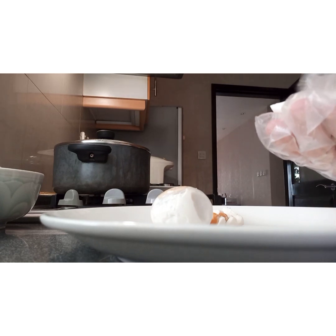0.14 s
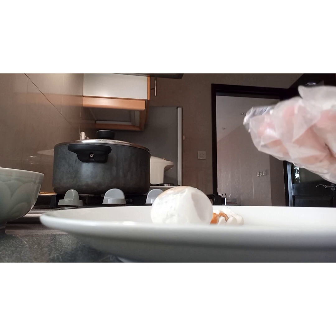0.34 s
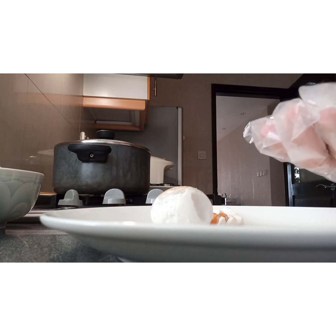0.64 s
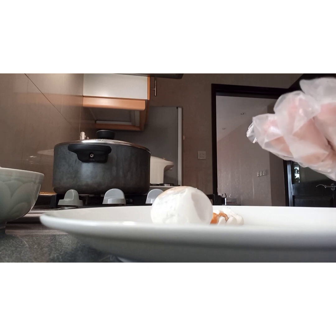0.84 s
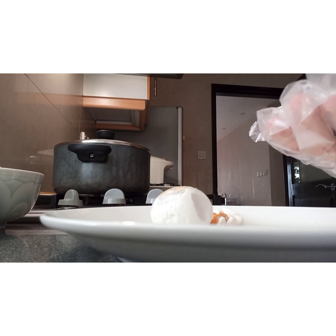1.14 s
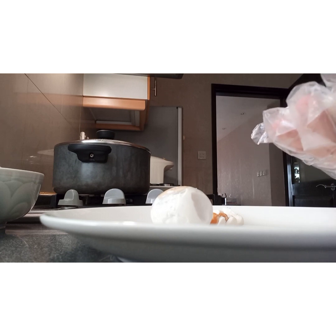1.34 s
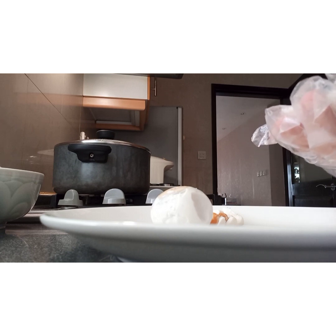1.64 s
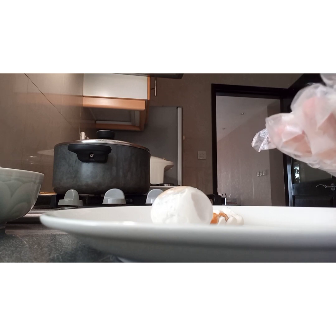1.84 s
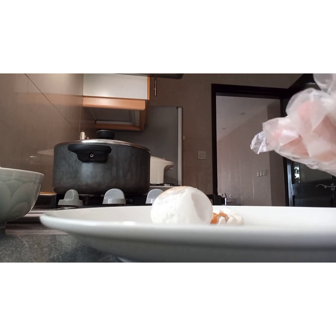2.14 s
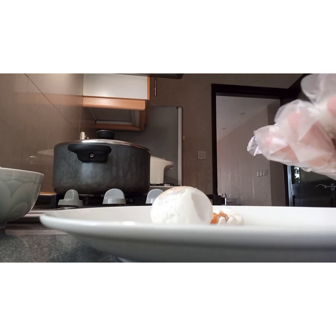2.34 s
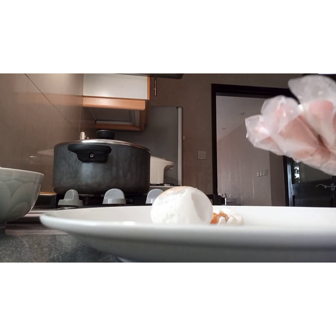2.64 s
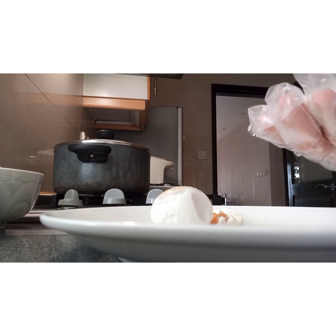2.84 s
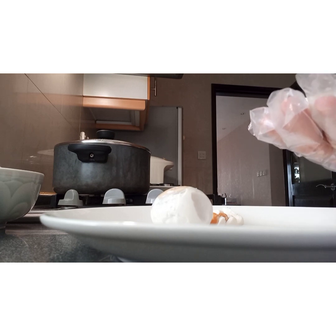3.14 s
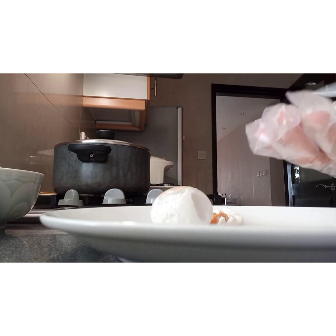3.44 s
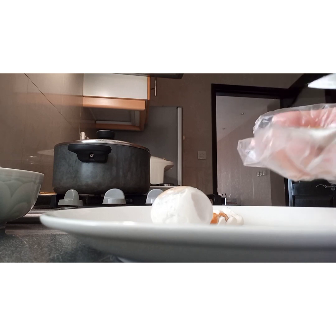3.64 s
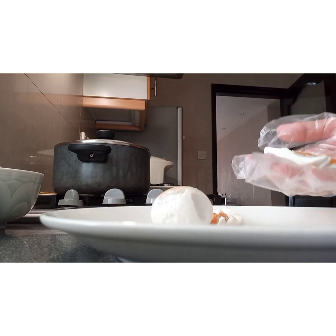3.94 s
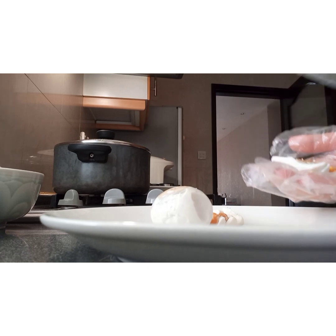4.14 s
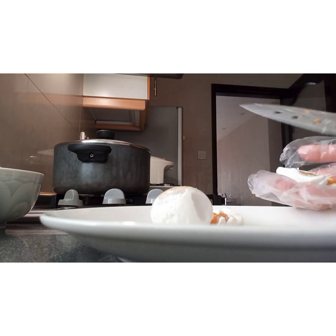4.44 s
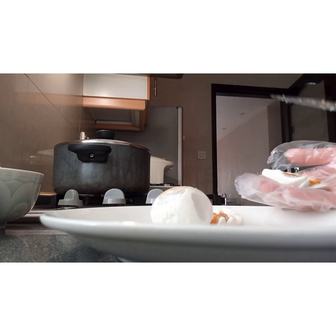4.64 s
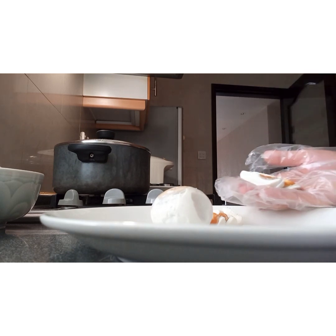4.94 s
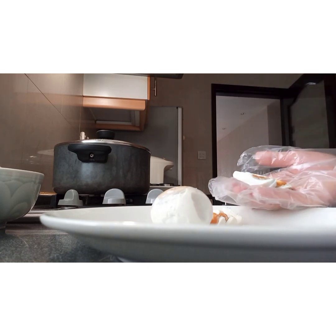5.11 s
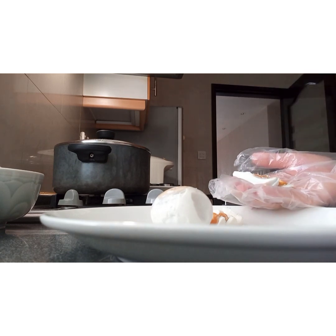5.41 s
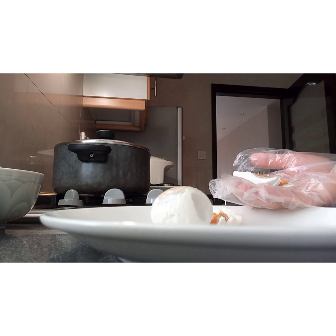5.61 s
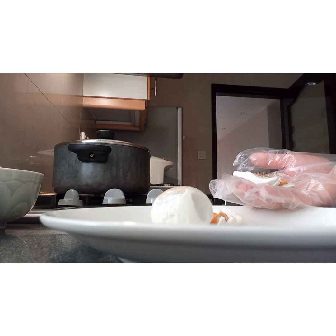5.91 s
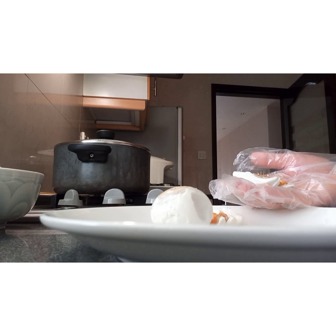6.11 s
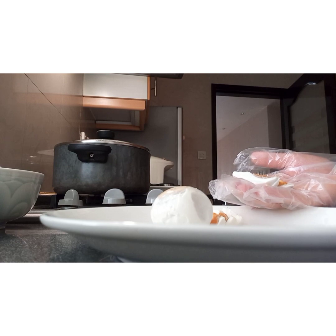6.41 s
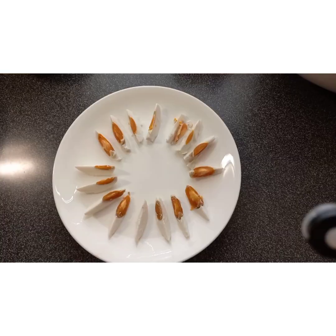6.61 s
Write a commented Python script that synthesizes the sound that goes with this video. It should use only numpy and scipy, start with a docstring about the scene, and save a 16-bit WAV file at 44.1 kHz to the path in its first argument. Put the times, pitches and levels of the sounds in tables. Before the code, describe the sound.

A thin plastic glove crinkles softly and a knife clicks a few times over a low kitchen rumble and faint hiss.

```python
"""A thin plastic glove crinkles as a hand holds food over a china plate and trims it with a knife.
The film buckles in swarms of tiny snaps, larger folds crack, and the blade clicks and rings.
Behind them: a slowly swelling kitchen rumble and microphone hiss.
Near the end the sound cuts out for a moment and comes back as a quieter motor hum."""
import sys
import numpy as np
from scipy import signal
from scipy.fft import rfft, irfft
from scipy.io import wavfile
from scipy.ndimage import uniform_filter1d

SR = 44100
rng = np.random.default_rng(int(sys.argv[2]) if len(sys.argv) > 2 else 0)


def transcribe(u):
    """Save the signal u as a 16-bit wav file named by the first command-line argument.

    u: samples, shape (n,) or (channels, n), limited to [-1, 1]; the rate is SR.
    q: integer samples, one column per channel.
    """
    v = np.clip(np.atleast_2d(u).T, -1, 1)
    q = np.round(v * 32767).astype(np.int16)
    wavfile.write(sys.argv[1], SR, q)


N = 298554
TIME_S = np.arange(N) / SR

# hand movements: (start [s], length [s], crinkle [dB], rubbing re crinkle [dB], pan L-R [dB])
HAND_MOVES = [(0.01, 0.12, -64, -9, -0.5), (0.176, 0.17, -60.5, -12, -1), (0.386, 0.071, -61, -4.5, -0.5),
              (0.881, 0.09, -74.5, -7, 2), (1.1, 0.044, -73.5, -6, 3), (1.286, 0.053, -70, -14, -4),
              (1.404, 0.12, -73, -8, -1), (1.552, 0.035, -63.5, -3, -2.5), (1.883, 0.15, -76, -2, 3),
              (2.3, 0.35, -85, -15, -7), (2.749, .014, -68.5, -13, -1), (3.543, .04, -66, -7, 0),
              (3.585, 0.028, -62, -0.5, 3.5), (3.888, 0.042, -65, -3.5, 0), (4, .13, -77, 1, 0),
              (4.187, 0.046, -61, 1, -0.5), (4.219, 0.097, -54, -0.5, -1), (4.473, 0.24, -61, -2.5, -1.5),
              (4.73, 0.076, -59, 0.5, -2.5), (4.866, 0.11, -61, -2, -3.5), (5.055, 0.09, -73, -9, -3),
              (5.247, 0.167, -70.5, -11, 0), (5.577, .19, -73, -22, 2.5)]
# fingers at work: (start [s], end [s])
FINGER_SPANS = [(0, 2.6), (3.5, 5.85)]
# large folds snapping through: (time [s], peak [dB], treble [dB], pan L-R [dB])
LARGE_FOLDS = [(.2567, -54, -32, -15), (.2992, -50, 5, -4), (.408, -49.5, -11, 5), (1.035, -57, -19, -2),
               (1.1292, -57.5, -7, -3), (1.1549, -53, -10, -7), (1.214, -58.5, -21, -8),
               (1.2944, -57.5, -17, -1.5), (1.3216, -52, -10, -4), (1.3299, -50, -14, 0),
               (1.4282, -49, -17, -6), (1.5706, -43, -17.5, -3), (1.5768, -48, -13, -10),
               (1.939, -48, 2, -9), (2.043, -53, -12, -7), (2.0687, -52, -22, -3), (3.493, -53.5, -18.5, 1),
               (3.5448, -52, -4, -2), (3.6012, -42, -11.5, -4), (3.9493, -49.5, -12, -2),
               (4.2354, -41.5, -11, 4), (4.3115, -40, 2, 13.5), (4.3414, -47, -2.5, 5),
               (4.6252, -46.5, -12, 9), (4.663, -45.5, -23, -11.5), (4.735, -47.5, -10, 9),
               (4.7733, -34.5, 1.5, 2.5), (4.7805, -46, -17, -4), (5.3666, -46.5, -21, -1.5),
               (5.5926, -57, -26.5, -2), (5.681, -50, 4, 2), (5.7433, -59.5, -10, -2)]
# buckling film: (frequency [Hz], density [dB])
FILM_SPECTRUM = [(1000, -17.5), (2900, -12), (3950, -2), (5100, -0.5), (6500, 1.5), (7000, 1), (7400, -11),
                 (8200, -9), (10000, -7), (13000, -8.5), (15500, -18)]
# rubbing grip: (frequency [Hz], density [dB])
RUB_SPECTRUM = [(400, -32.5), (850, 8.5), (1080, 14.5), (1250, 7.5), (1600, 9.5), (1950, -3), (2350, 2),
                (2900, 0.5), (4100, 12), (5400, -35.5), (9000, -17)]
# snapping fold: (frequency [Hz], density [dB])
FOLD_SPECTRUM = [(1500, -19.5), (3000, -26.5), (4800, -21.5), (5800, -6), (6650, 2), (7100, -3.5),
                 (7700, -5.5), (10500, -3.5), (13000, -6.5), (15500, -12.5)]
# knife contacts: (time [s], peak [dB], treble [dB], pan L-R [dB], tick [Hz], ring re tick [dB])
KNIFE_CONTACTS = [(4.091, -53, -35.5, -13, 6230, -11.5), (4.4343, -47.5, -1.5, .5, 6180, -23.5),
                  (4.484, -33, 0, -4, 7300, 7), (4.528, -52.5, 11, -4, 3770, -22),
                  (4.744, -51.5, 3, 1, 5680, -15), (4.954, -47.5, -8, -14.5, 6250, -12),
                  (4.984, -47.5, -1, 1, 5950, 1), (5.058, -37.5, -4.5, -0.5, 5870, -18),
                  (5.0648, -47, -11, -20, 6190, -25), (5.1257, -48, -4, -4, 5880, -24),
                  (5.4314, -50, -21, -7, 6130, -19)]
# blade modes: (frequency [Hz], level [dB], T60 [s])
BLADE_MODES = [(2360, -7.5, 0.015), (2617, -1.5, 0.027), (3960, -9, 0.03), (5520, 0.5, 0.018),
               (5810, -1.5, 0.011), (6900, -0.5, 0.025), (7900, -2.5, 0.03), (9390, 0, 0.02),
               (11200, -6.5, 0.035), (11000, -16, .02), (13000, -7.5, 0.015)]
# knife crack: (frequency [Hz], density [dB])
CRACK_SPECTRUM = [(800, -31), (1900, -12.5), (2500, -9.5), (3400, -8.5), (5800, -3), (7000, -18),
                  (8400, -4.5), (12000, -1.5), (15500, -6)]
# rumble, bass: (frequency [Hz], density [dB])
BOOM_SPECTRUM = [(15, -62), (28, -52), (38, -23.5), (50, -12), (60, -7), (70, 2), (95, 5), (104, 2),
                 (114, -0.5), (135, -9.5), (200, -33), (450, -75.5)]
# rumble, low middle: (frequency [Hz], density [dB])
BODY_SPECTRUM = [(25, -37), (105, -8), (128, -3.5), (143, 8.5), (168, -2), (232, -2.5), (255, 1.5),
                 (275, -2.5), (312, 3), (335, -2.5), (385, -1.5), (480, -7), (900, -36.5), (3000, -74)]
# rumble, upper part: (frequency [Hz], density [dB])
RUSH_SPECTRUM = [(30, -35.5), (250, 2), (520, 1.5), (610, 7), (690, 1), (790, 2), (880, -1), (1000, -3),
                 (1150, -9.5), (1450, -7), (1650, -15.5), (1850, -20), (2500, -27), (8000, -60.5)]
# rumble growth: (time [s], body [dB], rush [dB])
RUMBLE_SWELL = [(0.0, -53, -62), (0.5, -51.0, -62.5), (0.8, -55.5, -64.5), (1.3, -51, -64),
                (1.9, -53.0, -65), (2.6, -51, -62.5), (3.9, -51.0, -60.5), (4.3, -46, -56.5),
                (4.52, -52, -62.5), (4.75, -47.5, -57), (5.6, -49, -57), (6.5, -47.0, -56.5)]
# brief bass surges: (time [s], half width [s], rise [dB])
BOOM_SURGES = [(.28, 0.04, 6.5), (1.27, 0.063, 8), (1.56, 0.1, 7.5), (2.449, 0.1, 3), (3.08, .05, 5),
               (4.05, 0.036, 6.5), (4.35, 0.021, 9.5), (5.87, .06, 9), (6.2, 0.045, 8)]
# room noise under the hum: (frequency [Hz], density [dB])
ROOM_SPECTRUM = [(25, -39), (60, -15.5), (90, 3.5), (150, 1), (200, -13), (270, -11), (400, -16),
                 (700, -25.5), (1500, -28), (2500, -41), (6000, -53)]
# microphone hiss: (frequency [Hz], density [dB])
HISS_SPECTRUM = [(500, 6), (2000, 0), (3000, -3.5), (4100, 0.5), (5150, -2.5), (5550, 2.5), (6800, 5),
                 (7050, -1.5), (7350, -12), (8200, -11.5), (10000, -9.5), (13000, -7), (15500, -6.5)]


def crinkle(crinkle_rms, rub_rms, patches=14, buckles_per_s=1700, spread_db=4.2, decay_s=0.0005):
    """Patches of film buckle in swarms; a firm grip adds duller rubbing."""
    t = np.arange(SR // 200) / SR
    grains = 0
    for _ in range(patches):
        sizes = undb(spread_db * np.minimum(rng.exponential(size=N), 4)) * rng.choice([-1, 1], N)
        buckles = sizes * (rng.random(N) < buckles_per_s / patches / SR)
        paths = rng.standard_normal((2, len(t))) * np.exp(-t / decay_s)  # patch to each microphone
        paths /= np.linalg.norm(paths, axis=1, keepdims=True)
        grains += signal.oaconvolve(buckles[None], paths, axes=1)[:, :N]
    grains = steady(grains, span_s=0.094)
    film = crinkle_rms * unit_rms(colour(grains, FILM_SPECTRUM))
    rubbing = rub_rms * unit_rms(colour(grains, RUB_SPECTRUM))
    return film + rubbing


def hand(attack_s=0.0074, release_s=0.055):
    """Crinkle and rub envelopes: the film takes up strain, then settles. Moves add in power."""
    crinkle_power, rub_power = np.zeros((2, 2, N))
    for start_s, length_s, level_db, rub_db, pan_db in HAND_MOVES:
        attack = np.clip((TIME_S - start_s) / attack_s, 0, 1)
        release = np.exp(-np.clip(TIME_S - start_s - length_s, 0, 1) / release_s)
        power = (undb(level_db) * pan(pan_db) * attack * release) ** 2
        crinkle_power += power
        rub_power += power * undb(rub_db) ** 2
    return np.sqrt(crinkle_power), np.sqrt(rub_power)


def small_folds(crinkle_rms, busy_per_s=22, idle_per_s=5.4, threshold_db=-84.5, tries=120):
    """Random flips, denser and louder above a crinkle threshold; rows as in LARGE_FOLDS."""
    effort_db = np.maximum(20 * np.log10(crinkle_rms.mean(axis=0) + 1e-9) - threshold_db, 0)
    folds = []
    for start_s, end_s in FINGER_SPANS:
        span_s = end_s - start_s
        chances, scatter = rng.random((tries, 2)), rng.standard_normal((tries, 3))
        for (when, luck), (size, bright, side) in zip(chances, scatter):
            time_s = start_s + when * span_s
            excess_db = np.interp(time_s, TIME_S, effort_db)
            rate_per_s = busy_per_s if excess_db > 0 else idle_per_s
            if luck < rate_per_s * span_s / tries:
                peak_db = -61 + 0.19 * excess_db + 0.5 * size
                treble_db, pan_db = -26.5 + 6.5 * bright, 1.5 * side
                folds.append((time_s, peak_db, treble_db, pan_db))
    return folds


def fold_snaps(folds, decay_s=0.0018, samples=2048, max_folds=256):
    """Each fold flips over with a crack a few milliseconds long."""
    out, t = np.zeros((2, N)), np.arange(samples) / SR
    noises = rng.standard_normal((max_folds, 2, samples))
    for (time_s, peak_db, treble_db, pan_db), noise in zip(folds, noises):
        crack = colour(noise * np.exp(-t / decay_s), FOLD_SPECTRUM)
        place(out, time_s, shelf(crack, treble_db, edge_hz=7300), peak_db, pan_db)
    return out


def knife(tick_s=0.002, crack_s=0.0024, scrape_s=0.039, scrape_db=-13, bite_s=0.00065, samples=6000):
    """Each contact cracks, scrapes, ticks and rings the hand-damped blade."""
    out, t = np.zeros((2, N)), np.arange(samples) / SR
    mode_hz, mode_db, t60_s = np.transpose(BLADE_MODES)[:, :, None]
    mode_decay = undb(mode_db) * np.exp(-np.log(1000) * t / t60_s)
    contact = np.exp(-t / crack_s) + undb(scrape_db) * np.exp(-t / scrape_s)
    onset = 1 - np.exp(-t / bite_s)
    for time_s, peak_db, treble_db, pan_db, tick_hz, ring_db in KNIFE_CONTACTS:
        phase = rng.uniform(0, 2 * np.pi, mode_hz.shape)
        phase = phase + rng.normal(0, 1.0, (2, *mode_hz.shape))  # per channel
        ring = np.sum(mode_decay * np.sin(2 * np.pi * mode_hz * t + phase), axis=1)
        tick = np.exp(-t / tick_s) * np.sin(2 * np.pi * tick_hz * t + phase[:, 0])
        crack = colour(rng.standard_normal((2, samples)) * contact, CRACK_SPECTRUM)
        crack_gain = undb(3.5) * (0.081 + undb(ring_db))
        click = (tick + undb(ring_db) * ring + crack_gain * crack) * onset
        place(out, time_s, shelf(click, treble_db, edge_hz=8200), peak_db, pan_db)
    return out


def kitchen(x, wet_db, t60_s=0.25, build_s=0.0018):
    """Tiled walls and worktop return a short, bright tail."""
    t = np.arange(SR // 2) / SR
    envelope = np.exp(-np.log(1000) * t / t60_s) * (1 - np.exp(-t / build_s))
    tail = rng.standard_normal((2, len(t))) * envelope
    tail /= np.linalg.norm(tail, axis=1, keepdims=True)
    return x + undb(wet_db) * signal.fftconvolve(x, tail, axes=1)[:, :N]


def rumble(boom_re_body_db=-1):
    """Rumble like distant traffic booms in the low room modes; its diffuse top slowly grows."""
    swell_s, *levels_db = np.transpose(RUMBLE_SWELL)
    body_db, rush_db = [np.interp(TIME_S, swell_s, db) for db in levels_db]
    surge_db = sum(db * np.exp(-((TIME_S - time_s) / width_s) ** 2) for time_s, width_s, db in BOOM_SURGES)
    boom_db = body_db + boom_re_body_db + surge_db
    boom = steady(stereo_noise(BOOM_SPECTRUM, side_db=-20), span_s=0.3) * undb(boom_db)
    body = steady(stereo_noise(BODY_SPECTRUM, side_db=-16), span_s=0.32) * undb(body_db)
    rush = stereo_noise(RUSH_SPECTRUM, side_db=-0.76) * undb(rush_db)
    return boom * pan(0.26) + body * pan(1.4) + rush * pan(-2.0)


def motor_hum(hum_hz=77.4, hum_db=-51, room_db=-57):
    """A motor's low tone over faint room noise."""
    tone = unit_rms(np.sin(2 * np.pi * hum_hz * TIME_S))
    return undb(hum_db) * tone + undb(room_db) * stereo_noise(ROOM_SPECTRUM, side_db=-7.5)


def microphone_hiss(mid_db=-78):
    """Steady, wide microphone noise."""
    return undb(mid_db) * stereo_noise(HISS_SPECTRUM, side_db=-0.11) * pan(1.0)


def undb(db):
    """Decibels to gain."""
    return 10 ** (np.asarray(db) / 20)


def unit_rms(x):
    """Scale to rms 1."""
    return x / np.sqrt(np.mean(x ** 2))


def pan(pan_db):
    """Constant-power gains for a left-minus-right level."""
    gains = undb(np.array([[0.5], [-0.5]]) * pan_db)
    return gains / np.sqrt(np.mean(gains ** 2, axis=0))


def colour(x, spectrum, taps=8192):
    """Minimum-phase filter through (frequency [Hz], level [dB]) points."""
    hz, db = np.transpose(spectrum)
    grid_hz = np.maximum(np.arange(taps // 2 + 1) * SR / taps, 1)
    gain = undb(np.interp(np.log(grid_hz), np.log(hz), db))
    cepstrum = irfft(np.log(gain))
    cepstrum[1:taps // 2] *= 2
    cepstrum[taps // 2 + 1:] = 0
    impulse = irfft(np.exp(rfft(cepstrum)))
    return signal.fftconvolve(x, impulse[None], axes=1)[:, :x.shape[1]]


def stereo_noise(spectrum, side_db):
    """Coloured mid/side noise, mid at rms 1."""
    mid, side = colour(rng.standard_normal((2, N)), spectrum)
    return unit_rms(mid) + undb(side_db) * unit_rms(side) * np.array([[1], [-1]])


def steady(x, span_s):
    """Even out slow level swings."""
    power = uniform_filter1d(x.mean(axis=0) ** 2, int(span_s * SR))
    return x / np.sqrt(power + 1e-9)


def shelf(x, gain_db, edge_hz, width_hz=700):
    """Raise or lower everything above an edge."""
    hz = np.arange(x.shape[1] // 2 + 1) * SR / x.shape[1]
    above = (1 + np.tanh((hz - edge_hz) / width_hz)) / 2
    return irfft(rfft(x) * undb(gain_db * above), x.shape[1])


def place(out, time_s, x, peak_db, pan_db):
    """Mix in a short sound; peak_db sets its highest 1 ms rms."""
    peak = np.sqrt(uniform_filter1d(np.mean(x ** 2, axis=0), SR // 1000).max())
    start = int(time_s * SR)
    out[:, start:start + x.shape[1]] += (x / peak * undb(peak_db) * pan(pan_db))[:, :N - start]


def scene(stop_s=6.536, resume_s=6.662, fade_s=0.001):
    """Glove and knife over rumble and hiss; a short silence; hum and hiss."""
    hiss = microphone_hiss()
    crinkle_rms, rub_rms = hand()
    film = crinkle(crinkle_rms, rub_rms) + fold_snaps(LARGE_FOLDS + small_folds(crinkle_rms))
    glove = kitchen(film, wet_db=-7)
    blade = kitchen(knife(), wet_db=-12)
    # the left microphone catches more of the top octave
    handling = shelf(glove + blade, gain_db=np.array([[1.2], [-1.2]]), edge_hz=8000)
    before_gap = np.clip((stop_s - TIME_S) / fade_s, 0, 1)
    after_gap = np.clip((TIME_S - resume_s) / fade_s, 0, 1)
    return (handling + rumble() + hiss) * before_gap + (motor_hum() + hiss) * after_gap


def record(dry, cutoff_hz=15800):
    """The phone cuts the top."""
    return signal.sosfilt(signal.ellip(10, 0.2, 70, cutoff_hz, fs=SR, output="sos"), dry)


dry = scene()
out = record(dry)
transcribe(out)
```